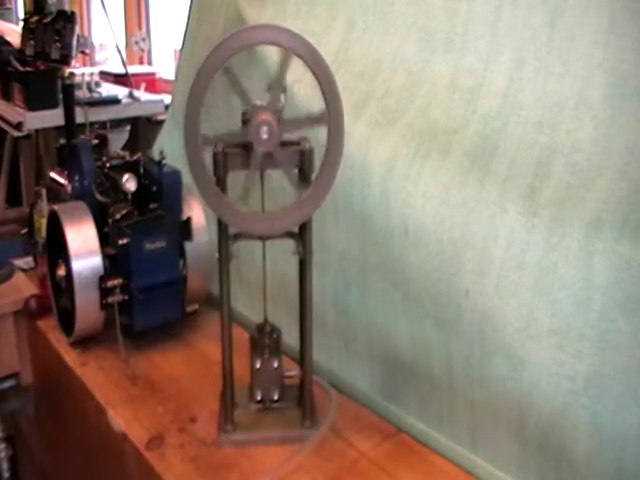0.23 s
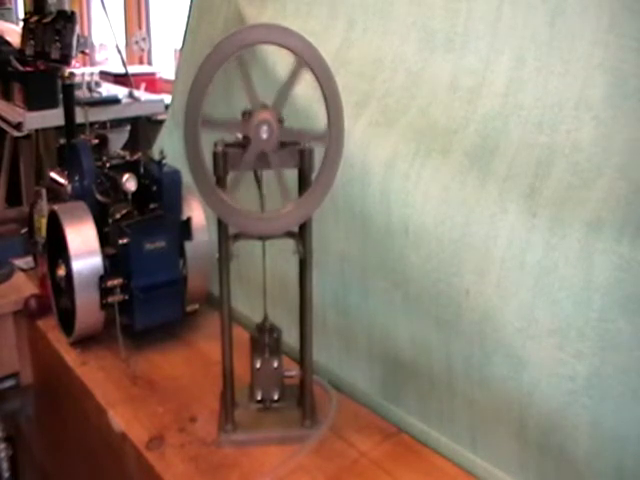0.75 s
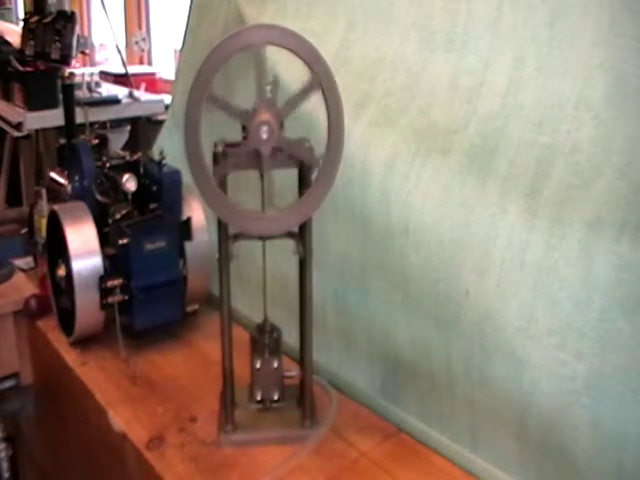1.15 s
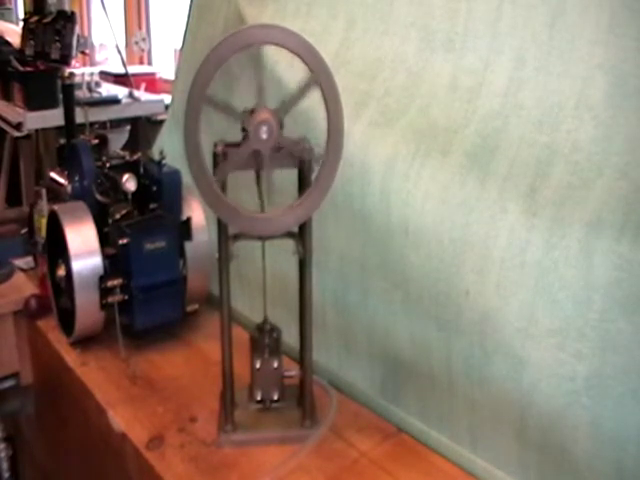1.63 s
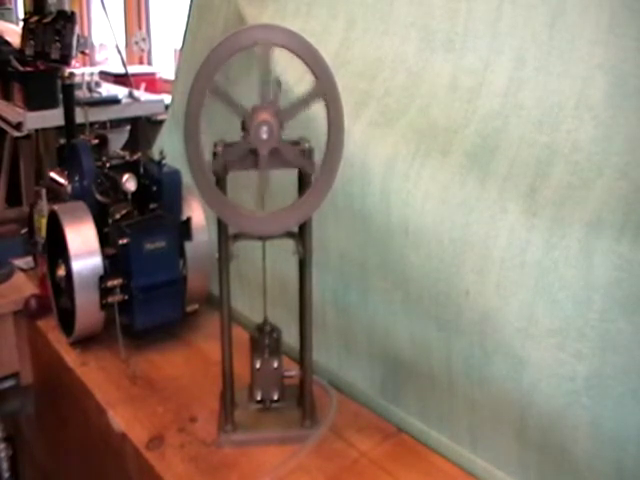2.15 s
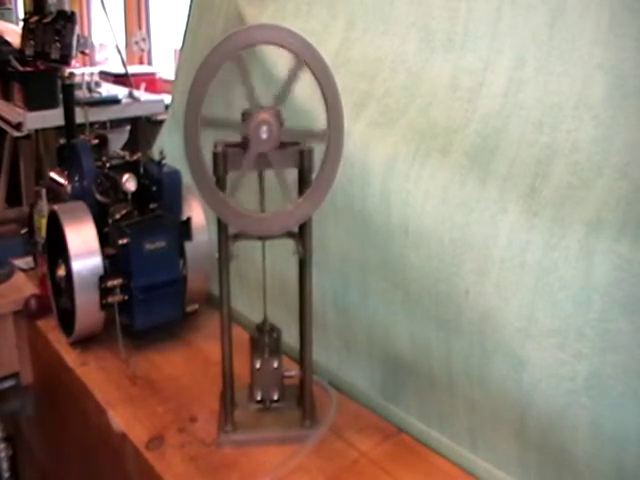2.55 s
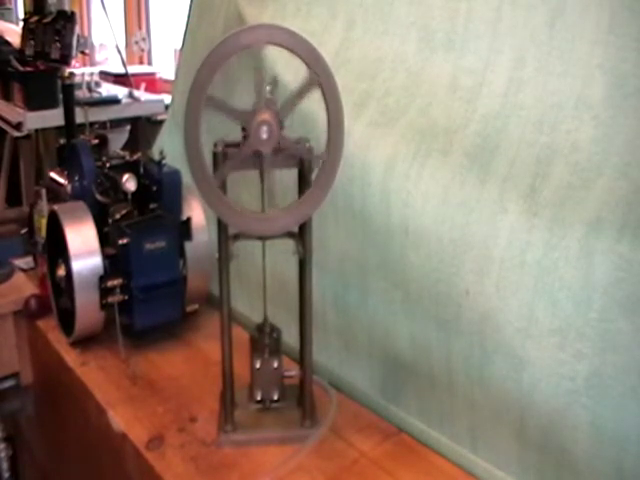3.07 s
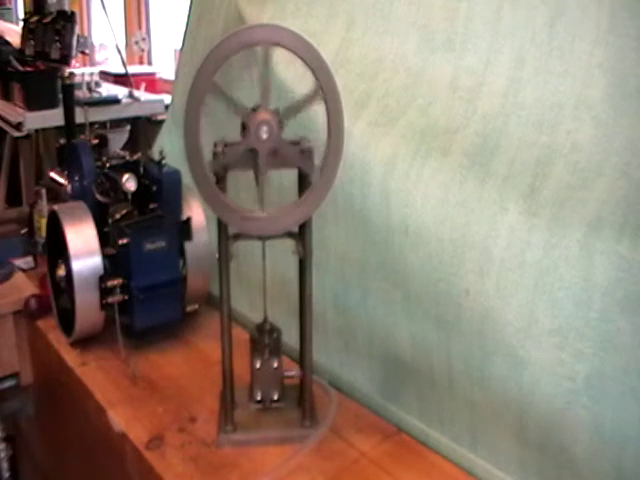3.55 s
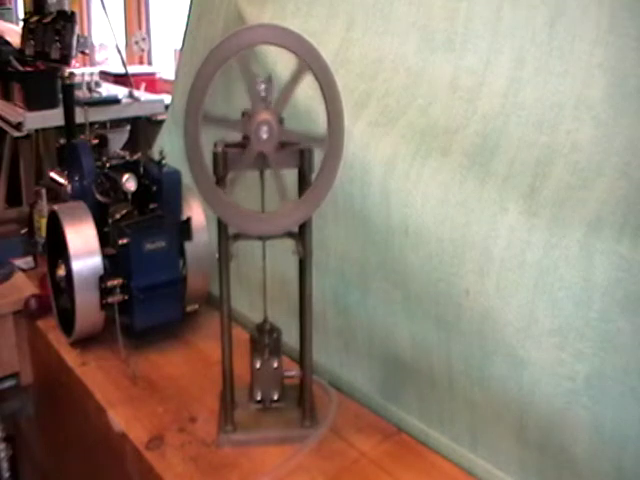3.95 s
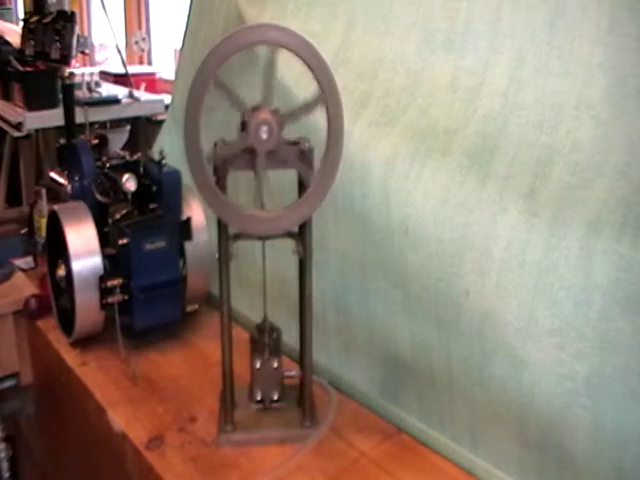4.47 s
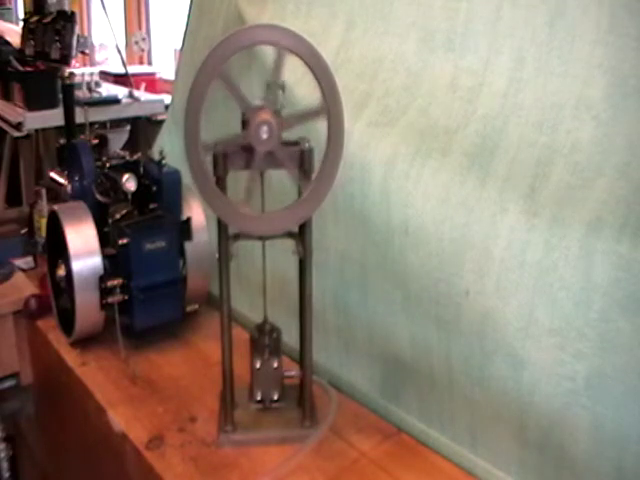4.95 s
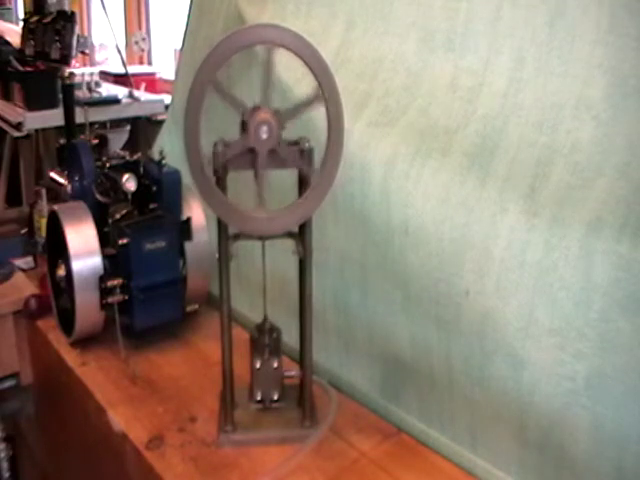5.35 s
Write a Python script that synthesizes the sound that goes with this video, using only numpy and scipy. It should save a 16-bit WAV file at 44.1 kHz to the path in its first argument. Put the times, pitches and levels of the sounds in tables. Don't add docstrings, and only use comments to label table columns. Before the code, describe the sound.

A small flywheel engine runs on compressed air on a wooden bench indoors. Bright hisses alternate each half turn, with a faint airy whistle near 2.3 kHz and dull knocks about twice a second. Just after one second a loose metal part scrapes and clatters loudly, stopping abruptly. The engine then continues alone, slightly faster. Close stereo microphone, small room, little echo.

```python
import sys
import numpy as np
from scipy import signal
from scipy.fft import rfft, irfft, next_fast_len
from scipy.io import wavfile
from scipy.ndimage import uniform_filter1d, map_coordinates

SR = 44100
rng = np.random.default_rng(int(sys.argv[2]) if len(sys.argv) > 2 else 0)


def bounce(signal):
    frames = np.transpose(np.atleast_2d(signal))
    limited = np.clip(frames, -1, 1)
    pcm = np.round(limited * 32767).astype(np.int16)
    wavfile.write(sys.argv[1], SR, pcm)


def field_ratio(decibels):
    return 10 ** (np.asarray(decibels, dtype=float) / 20)


N = 247401

TURN_STARTS = [-.89, .1126, 1.116, 2.1066, 3.055, 3.9739, 4.8765, 5.755]
# pitch_hz, density_db (per Hz)
UPPER_JET = [(1530, -17), (2600, -15), (3170, -6), (4000, -8), (4950, 0.5), (6300, -9), (6850, -4),
             (8460, 1), (9260, -4.5), (10500, -1.5), (11100, -1), (12900, -11.5), (15800, -28)]
LOWER_JET = [(1530, -37), (2600, -1), (3790, -17.5), (4320, -6.5), (5930, 0), (6400, -1.5), (7840, -6),
             (8720, 0.5), (10800, -5), (11700, -8.5), (12300, -24), (13300, -11), (15800, -28)]
# pitch_hz, width_hz, level_db
UPPER_CAVITY = [(5200, 350, -1.5), (6500, 420, -8), (6730, 220, -11), (7040, 250, 2), (7900, 470, 1),
                (10335, 390, 7), (10800, 300, 2), (11300, 400, -5), (11700, 350, 2), (12500, 400, 1)]
LOWER_CAVITY = [(5650, 350, -1.5), (6450, 520, 8.5), (8670, 580, 5), (9550, 400, 2.5), (10000, 220, -9),
                (10250, 300, -5), (10950, 250, 1), (11830, 550, 9.5)]
# pitch_hz, width_hz, level_db
PIPE_MODES = [(2205, 45, 0), (2290, 100, -3.5), (2400, 160, -10)]
# turn_share (0-1), level_db
UPPER_FLOW = [(0, -42.5), (.1, -47.5), (.2, -42), (.3, -45.5), (.51, -44.5), (.575, -58), (.87, -63),
              (.975, -54), (1, -42.5)]
LOWER_FLOW = [(0, -51), (.1, -46), (.33, -43.5), (.51, -63), (.565, -43.5), (.72, -42), (.79, -51),
              (.9, -54), (1, -51)]
PIPE_FLOW = [(0, -57), (.05, -66), (.14, -56), (.31, -47.5), (.5, -50.5), (.73, -46), (.89, -61),
             (.93, -53), (1, -57)]
GLAND_FLOW = [(0, -53), (.15, -52.5), (.42, -63), (.53, -56), (.74, -60), (.93, -52), (1, -53)]
# turn_share (0-1), level_db, pitch_hz
PORT_TONE = [(0, -75, 5900), (.53, -75, 5900), (.58, -52, 6000), (.66, -51, 6350), (.74, -53, 6550),
             (.84, -72, 6600), (1, -75, 6600)]
# turn_share (0-1), level_db
BEARING_LOAD = [(0, 0), (.1, 1.5), (.25, 4), (.33, -2.5), (.44, -1.5), (.51, 5), (.66, 0), (.86, -4),
                (1, 2.5)]
# time_s, level_db
HUM_LEVEL = [(0, -64), (.36, -64), (.8, -58), (1.37, -65), (2.64, -62), (3.02, -52), (3.3, -63),
             (3.45, -62), (3.66, -49), (4.62, -52.5), (4.76, -61), (5.61, -53)]
# centre_s, lift_db, width_s
JOLTS = [(.42, 3, .14), (.64, 9, .06), (1.28, 15, .05), (1.6, 3, .15)]
# time_s, level_db
RUSTLE_LEVEL = [(0, -70), (.15, -62), (.42, -55), (.62, -55), (.8, -54), (.9, -68), (1.4, -60), (1.95, -62),
                (2.1, -75), (5.61, -75)]
# start_s, peak_db
UNSEAT_SPURTS = [(1.057, -42.5), (2.0416, -40.5), (2.9911, -40), (3.92, -42), (4.8309, -38.5)]
SLAP_SPURTS = [(.073, -41.5), (3.0185, -43.5), (3.951, -43), (4.85, -48)]
OPEN_SPURTS = [(.1126, -33), (2.1066, -34.5), (3.055, -35), (3.9739, -33.5), (4.8765, -32)]
REVERSE_SPURTS = [(.599, -44), (1.61, -37), (2.5326, -44.5), (3.507, -41), (4.417, -38.5), (5.314, -39)]
CLOSE_SPURTS = [(.646, -41), (2.5835, -39), (2.609, -35), (3.542, -37.5), (4.454, -44)]
# pitch_hz, length_s, thud_db
SPURT_KINDS = [
    (2280, .016, -7),
    (2340, .01, 3),
    (2390, .0085, -21),
    (2370, .014, -1.5),
    (2420, .004, -16),
]
# start_s, peak_db, snap_db
TOP_KNOCKS = [
    (0.212, -23, -20),
    (2.192, -20, -20),
    (3.137, -19.5, -15),
    (4.056, -19.5, -16),
    (4.954, -19, -15.5),
]
BOTTOM_KNOCKS = [
    (0.664, -26, -9),
    (1.661, -24.5, -11),
    (2.624, -25, -15),
    (3.566, -23.5, -21),
    (4.474, -23.5, -12),
    (5.361, -24, -12),
]
# start_s, peak_db
TAKE_UP = [(0.182, -33), (2.168, -33), (3.12, -29.5), (4.036, -31), (4.934, -28.5)]
# pitch_hz, t60_s, top_knock_db, bottom_knock_db, take_up_db
BENCH_MODES = [(180, 0.076, -6, -0.5, -8), (218, 0.091, -5, -5, -22), (287.8, 0.095, -3, -2.5, -8),
               (336, 0.084, 0, -1.5, -11), (405.6, 0.17, -13, -11, -12), (455.6, 0.088, -9.5, -3.5, -21),
               (543.7, 0.083, 1.5, -1.5, 1), (580.7, 0.089, -2.5, -3, 4), (636, .09, -2.5, -7.5, -12),
               (735, 0.083, -4.5, -5.5, 3), (882, 0.068, -9, -17.5, -19), (964, .11, -11.5, -10.5, -27),
               (1078.4, 0.052, -4.5, -1, -12), (1262, 0.036, -5.5, -13, -23), (1365, 0.066, -10.5, -2, -14),
               (1508, 0.046, -4, -4.5, -12), (1675, 0.024, -4, -5, -14), (1865, 0.04, -12, -25, -30),
               (2300, 0.036, -8, -26, -30), (2450, 0.037, -10, -26, -30), (2800, .04, -14, -22, -30),
               (2890, 0.032, -7, -16, -30), (3020, 0.034, -6, -24, -30)]
# start_s, peak_db, low_part_db
ROD_REVERSALS = [(0.6053, -35, -1), (1.6008, -35, -12), (2.5794, -33, -6), (3.5009, -35, -8),
                 (4.4194, -42, -5), (5.2999, -33, -10)]
# start_s, level_db, pitch_hz
BUMPS = [(.075, -42, 750), (.075, -39, 342), (.119, -45, 1730), (.305, -38, 1200), (.44, -42, 747),
         (.572, -41, 1020), (.583, -37, 1230), (.603, -42, 1080), (.59, -44, 1740), (.62, -38.5, 71),
         (.794, -43, 750), (.81, -46, 1100), (3.95, -41, 740), (4.15, -35, 169)]
# start_s, level_db, pitch_hz
THUMPS = [(1.117, -21.5, 174), (1.117, -24, 579), (1.117, -27, 290), (1.12, -29, 800), (1.17, -25, 412),
          (1.19, -26, 170), (1.17, -34, 70), (1.205, -24, 547), (1.21, -27, 400), (1.25, -19.5, 406),
          (1.255, -31, 199), (1.272, -30, 600), (1.28, -37, 70), (1.305, -40, 336)]
# start_s, level_db, rise_s, t60_s, loudest_hz
SCRAPES = [
    (1.119, -20, 0.0035, 0.26, 3100),
    (1.145, -11.5, 0.0056, .13, 2850),
    (1.15, -19, 0.0093, 0.2, 1570),
    (1.172, -20, 0.0067, .3, 3500),
    (1.2, -24, 0.012, 0.28, 1100),
    (1.2514, -16, 0.001, 0.11, 6100),
    (1.255, -19.5, 0.0044, 0.19, 2200),
    (1.275, -19, 0.011, 0.14, 2900),
]
# pitch_hz, width_hz, level_db
PART_MODES = [(1098, 59, -2), (1550, 69, -4), (2160, 60, -2), (2820, 210, -7), (3570, 91, -0.5),
              (4100, 170, -20), (4650, 32, -4), (5880, 19, -8), (6950, 48, -3), (8700, 120, -8)]
# pitch_hz, density_db (per Hz)
PART_SPECTRUM = [(71, -44), (120, -12), (167, 4), (405, -5.5), (836, -10), (1530, -3.5), (1830, -4.5),
                 (2820, -8), (6810, -11), (9500, -14.5), (13000, -48)]
# start_s, level_db, pitch_hz
BOUNCES = [(1.121, -27.2, 2411), (1.1235, -27.0, 1550), (1.125, -30.0, 3703), (1.128, -28.8, 2670),
           (1.1364, -24.3, 1550), (1.1439, -19.2, 2842), (1.1464, -27.0, 1119), (1.1479, -28.5, 3962),
           (1.1479, -23.3, 1722), (1.1494, -28.4, 6976), (1.1514, -18.5, 2756), (1.1529, -26.4, 4737),
           (1.1549, -30.2, 6546), (1.1554, -21.1, 3359), (1.1569, -22.1, 2670), (1.1574, -21.5, 2239),
           (1.1619, -21.0, 1550), (1.1639, -23.9, 2928), (1.1699, -27.9, 3617), (1.1738, -25.6, 1550),
           (1.1758, -27.9, 2842), (1.1773, -29.0, 3617), (1.1793, -24.8, 1378), (1.1853, -23.0, 1205),
           (1.1893, -29.4, 2670), (1.1908, -24.2, 1119), (1.1993, -25.3, 1205), (1.2177, -27.4, 1119),
           (1.2507, -27.6, 2756), (1.2507, -23.3, 1722), (1.2512, -26.5, 5857), (1.2517, -26.2, 3531),
           (1.2517, -25.7, 6890), (1.2567, -29.3, 6287), (1.2577, -29.3, 5770), (1.2582, -28.3, 3359),
           (1.2611, -26.4, 2670), (1.2636, -27.4, 3703), (1.2661, -30.4, 5770), (1.2681, -22.8, 1636),
           (1.2686, -28.4, 2670), (1.2736, -28.6, 2842), (1.2856, -28.5, 1636), (1.2861, -29.5, 3186)]
# pitch_hz, density_db (per Hz)
ROOM_TONE = [(20, -48), (31, -8), (161, -1.5), (245, -8.5), (524, -7.5), (629, -12.5), (1580, -17),
             (2270, -6.5), (2590, -13.5), (3370, -10), (3950, -17), (6330, -6.8), (11900, -14),
             (13200, -13.5), (15800, -22)]
# pitch_hz, width_hz, level_db
LEAK = [(5830, 1300, 2), (8140, 410, 6), (10700, 400, -4), (12300, 300, -1.5)]
# pitch_hz, t60_s
WALL_DECAY = [(150, 0.25), (1000, 0.087), (8000, 0.2)]
# pitch_hz, level_db
SIDE_LEVEL = [(60, -11.5), (200, -17.5), (600, -11), (950, -6.5), (2300, -16.5), (3300, -15), (4000, -14.5),
              (5700, -18), (7300, -19), (8100, -21), (9200, -12), (10400, -12), (12000, -4.5),
              (15500, -6.5)]
# pitch_hz, width_hz, level_db
HOUSING = [(3930, 390, -1.5), (4370, 270, 1.5), (4650, 260, -2.5), (7210, 200, -1), (9320, 220, -1.5),
           (12100, 300, -1.5), (13100, 500, 2.5), (14050, 250, -2), (14400, 300, 2), (15050, 400, -3),
           (15600, 250, 3)]


def unit(x):
    return x / np.sqrt(np.mean(x ** 2) + 1e-20)


def along(points, hz):
    f, v = np.transpose(points)
    return np.interp(np.log(hz + 1), np.log(f + 1), v)


def over_time(points):
    return field_ratio(np.interp(np.arange(N) / SR, *np.transpose(points)))


def turn_share():
    return np.interp(np.arange(N) / SR, TURN_STARTS, np.arange(len(TURN_STARTS))) % 1


def per_turn(points):
    return field_ratio(np.interp(turn_share(), *np.transpose(points)))


def wobble(rate):
    knots = rng.standard_normal(int(N * rate / SR) + 4)
    return map_coordinates(knots, [np.arange(N) * rate / SR])


def filtered(x, response):
    m = next_fast_len(x.shape[-1] + 8192)
    spectrum = rfft(x, m) * response(np.fft.rfftfreq(m, 1 / SR))
    return irfft(spectrum, m)[..., :x.shape[-1]]


def resonances(peaks, f):
    return sum((-1) ** k * field_ratio(db) * 1j * f * width / (hz * hz - f * f + 1j * f * width)
               for k, (hz, width, db) in enumerate(peaks))


def bumps(peaks, f):
    return field_ratio(sum(db * np.exp(-2 * ((f - hz) / width) ** 2) for hz, width, db in peaks))


def ripple(f, spacing_hz, depth_db):
    knots = rng.standard_normal(2000)
    return field_ratio(depth_db * map_coordinates(knots, [np.minimum(f / spacing_hz, 1999)]))


def rush(response, patchy_db):
    z = signal.stft(rng.standard_normal(N + 512), nperseg=512)[2]
    field = uniform_filter1d(rng.standard_normal(z.shape), 6, 0)
    field = uniform_filter1d(field, 10, 1)
    patchy = signal.istft(z * field_ratio(patchy_db * unit(field)), nperseg=512)[1][:N]
    return unit(filtered(patchy, response))


def shaped(envelope, noise):
    return unit(envelope * noise) * np.sqrt(np.mean(envelope ** 2))


def gritty(length, hold, spread_db):
    noise = rng.standard_normal(length)
    steps = rng.standard_normal(length // hold + 1).repeat(hold)[:length]
    return noise * field_ratio(spread_db * steps)


def add(track, s, sound):
    part = track[round(s * SR):][:len(sound)]
    part += sound[:len(part)]


def air():
    t = np.arange(N) / SR
    upper = rush(lambda f: field_ratio(along(UPPER_JET, f)) * bumps(UPPER_CAVITY, f) * ripple(f, 28, depth_db=2.2),
                 patchy_db=1.1)
    lower = rush(lambda f: field_ratio(along(LOWER_JET, f)) * bumps(LOWER_CAVITY, f) * ripple(f, 28, depth_db=2.6),
                 patchy_db=1.5)
    jets = field_ratio(5) * per_turn(UPPER_FLOW) * upper + field_ratio(1.5) * per_turn(LOWER_FLOW) * lower
    supply_db = .6 - .28 * t + .7 * wobble(12)
    pipe = rush(lambda f: resonances(PIPE_MODES, f) / (1 + (2165 / (f + 1)) ** 60), patchy_db=.8)
    steadiness = .6
    pipe = unit(pipe / (uniform_filter1d(pipe ** 2, SR // 25) + .05) ** (steadiness / 2))
    first_turn_db = -3 * (t < 1.3)
    whistle = per_turn(PIPE_FLOW) * field_ratio(first_turn_db + .6 * wobble(25)) * pipe
    return jets * field_ratio(supply_db) + field_ratio(-0.3) * whistle


def port_tone():
    share, db, hz = np.transpose(PORT_TONE)
    turn = turn_share()
    fuzz = unit(filtered(rng.standard_normal((2, N)), lambda f: 1 / (1 + (f / 260) ** 4)))
    phase = 2 * np.pi * np.cumsum(np.interp(turn, share, hz)) / SR
    return field_ratio(np.interp(turn, share, db)) * (fuzz[0] * np.cos(phase) + fuzz[1] * np.sin(phase))


def gland():
    jet = filtered(rng.standard_normal(N), lambda f: resonances([(13200, 2200, 0)], f) ** 2 * (f > 12300))
    return per_turn(GLAND_FLOW) * unit(jet)


def shake():
    t = np.arange(N) / SR
    jolt_db = sum(db * np.exp(-((t - s) / width) ** 2) for s, db, width in JOLTS)
    force = field_ratio(jolt_db) * per_turn(BEARING_LOAD)
    hum = over_time(HUM_LEVEL) * field_ratio(2.4 * wobble(16))
    hum = hum * rush(lambda f: resonances([(167, 15.5, 0)], f), patchy_db=0.0)
    buzz_db = -56 - 8 / (1 + np.exp((1.95 - t) / .15))
    buzz = field_ratio(buzz_db + 1.3 * wobble(6.2) - 2)
    buzz = buzz * rush(lambda f: resonances([(353, 13, 0)], f), patchy_db=-2.4)
    modes = [(hz, 70, db) for hz, _, db, *_ in BENCH_MODES[5:17]]
    rattle = field_ratio(-59 + 3.1 * wobble(20) - 4) * rush(lambda f: resonances(modes, f), patchy_db=2.0)
    return force * (hum + buzz + rattle)


def room():
    low_hum = [(39.7, 16, 4), (98, 24, -3.5)]  # pitch_hz, width_hz, level_db
    return field_ratio(-43) * rush(lambda f: field_ratio(along(ROOM_TONE, f)) * bumps(LEAK + low_hum, f)
                           * ripple(f, 30, depth_db=1.5), patchy_db=1.74)


def rustle():
    friction = rush(lambda f: resonances([(1150, 350, 0), (1650, 400, -2)], f), patchy_db=2.5)
    return over_time(RUSTLE_LEVEL) * field_ratio(2.5 * wobble(30)) * friction


def spurts():
    out, t = np.zeros(N), np.arange(SR // 8) / SR
    tables = (UNSEAT_SPURTS, SLAP_SPURTS, OPEN_SPURTS, REVERSE_SPURTS, CLOSE_SPURTS)
    bench = [(c, 60, -3) for c, *_ in BENCH_MODES[:10]]
    for table, (hz, length, thud_db) in zip(tables, SPURT_KINDS):
        swell = t / length * np.exp(1 - t / length)
        neighbours = [(1.38 * hz, 400, -20), (.75 * hz, 300, -17)]

        def jet_response(f):
            broad = field_ratio(-21) * (f > 1500) / (1 + (f / 6000) ** 4)
            return resonances([(hz, 330, 0)], f) ** 2 + resonances(neighbours, f) + broad

        for s, db in table:
            jet, push = rng.standard_normal((2, len(t)))
            jet = unit(filtered(jet, jet_response))
            push = unit(filtered(push, lambda f: resonances(bench, f)))
            spurt = field_ratio(db - 2.5) * shaped(swell, jet) + field_ratio(db + thud_db - 7) * shaped(swell, push)
            add(out, max(s - .005, 0), spurt)
    return out


def stand():
    out, t = np.zeros(N), np.arange(SR // 3) / SR
    for s, db, hz in BUMPS + THUMPS:
        rise, t60 = np.array([.008, .14]) * (400 / hz) ** .45
        drift = np.cumsum(rng.standard_normal(len(t))) * 0.025 * max(hz / 400, 1)
        envelope = field_ratio(db - 60 * t / t60) * (1 - np.exp(-t / rise))
        add(out, s, envelope * np.sin(2 * np.pi * hz * t + drift))
    return out


def knocks():
    out, t = np.zeros(N), np.arange(SR // 5) / SR
    hz, t60, *levels = np.transpose(BENCH_MODES)[:, :, None]
    touches = [(s, db, -24) for s, db in TAKE_UP]
    build_cycles = (3.2, 2.2, 5.5)
    for table, mode_db, cycles in zip((TOP_KNOCKS, BOTTOM_KNOCKS, touches), levels, build_cycles):
        start = rng.uniform(-np.pi, np.pi, hz.shape) / 2
        build = 1 - np.exp(-t * hz / cycles)
        hold_db = -60 * (t / (1.15 * t60)) ** 1.35
        late = np.maximum(t - .021, 0)
        rebound = field_ratio(mode_db - 5.5 - 60 * late / t60 - 5 * hz / 1000) * (1 - np.exp(-late / 0.0028))
        rebound = np.sum(rebound * np.sin(2 * np.pi * hz * late), axis=0)
        for s, db, snap_db in table:
            scatter_db = rng.normal(0, .8, hz.shape)
            bright_db = (snap_db + 15) * (hz > 2000)
            modes = field_ratio(mode_db + bright_db + scatter_db + hold_db) * build
            ring = np.sum(modes * np.sin(2 * np.pi * hz * t + start), axis=0)
            shudder = filtered(rng.standard_normal(len(t)), lambda f: resonances([(400, 420, 0)], f) ** 2)
            shudder = field_ratio(2.5 - 60 * t / .15) * (1 - np.exp(-t / .012)) * unit(shudder)
            snap = filtered(rng.standard_normal(len(t)), lambda f: resonances([(3200, 3000, 0)], f))
            snap = snap * field_ratio(snap_db + 18.5 - 60 * t / 0.037) * (1 - np.exp(-t / 0.0012))
            add(out, s - .0042, field_ratio(db - 10.5) * (ring + rebound + shudder + snap))
    return out


def rattles():
    out, t = np.zeros(N), np.arange(SR // 10) / SR
    for s, db, low_db in ROD_REVERSALS:
        rod = [(1100, 1200, low_db), (3900, 1400, 0)]
        chatter = filtered(gritty(len(t), 40, 4), lambda f: resonances(rod, f))
        envelope = field_ratio(db - 5.5 - 60 * t / .12) * (1 - np.exp(-t / 0.0017))
        add(out, s - .003, shaped(envelope, chatter))
    return out


def scrape():
    out, t = np.zeros(N), np.arange(SR // 4) / SR
    lift = [(c, w * 1.7, 8.5 + db / 2) for c, w, db in PART_MODES]
    for s, db, rise, t60, hz in SCRAPES:
        tilt_db = .3 * np.clip(db + 19, -5, 4)

        def part_response(f):
            octaves = np.log2(np.maximum(f, 800) / 2000)
            spectrum = field_ratio(along(PART_SPECTRUM, f) + tilt_db * octaves)
            return spectrum * bumps(lift + [(hz, 0.42 * hz, 4)], f) * ripple(f, 90.24, depth_db=2.1)

        friction = filtered(gritty(len(t), 30, 2.4), part_response)
        envelope = field_ratio(db - 60 * t / t60) * (1 - np.exp(-t / rise))
        add(out, s, shaped(envelope, friction))
    stop = 1 / (1 + np.exp(np.clip((np.arange(N) / SR - 1.305) / 0.011, -50, 50)))
    return field_ratio(-3) * out * stop


def strikes():
    out, t = np.zeros(N), np.arange(SR // 12) / SR
    chance = rng.uniform(-1, 1, (len(BOUNCES), 3))
    for (s, db, hz), (a, b, c) in zip(BOUNCES, chance):
        t60 = .043 * (2000 / hz) ** .2
        split_hz = hz + 160 * c
        pair = np.sin(2 * np.pi * (hz * t + a)) + .45 * np.sin(2 * np.pi * (split_hz * t + b))
        add(out, s, field_ratio(db + 4.3 - 60 * t / t60) * (1 - np.exp(-t / .002)) * pair)
    return out


def walls(x):
    hz, t, z = signal.stft(rng.standard_normal((2, SR // 2)), SR, nperseg=256)
    tail = signal.istft(z * field_ratio(-60 * t / along(WALL_DECAY, hz)[:, None]), SR, nperseg=256)[1]
    tail = tail / np.linalg.norm(tail[0])
    delayed = np.pad(x, (300, 0))[None]
    return signal.fftconvolve(delayed, tail, axes=1)[:, :N]


def spread(x):
    mid = filtered(x, lambda f: bumps(HOUSING, f))
    side = filtered(np.roll(x, SR // 30), lambda f: field_ratio(along(SIDE_LEVEL, f)))
    return np.array([mid + side, mid - side])


def scene():
    steady = spread(air() + port_tone() + gland() + shake() + room() + rustle())
    hits = spurts() + stand() + knocks() + rattles() + scrape() + strikes()
    aside = filtered(np.roll(hits, SR // 200), lambda f: resonances([(2500, 4100, 0)], f)) * [[1], [-1]]
    balance = field_ratio([[.15], [-.15]])
    return (steady + hits + field_ratio(-15) * walls(hits) + field_ratio(-13.5) * aside) * balance


def low_pass(x):
    return signal.sosfilt(signal.butter(12, 16000, fs=SR, output="sos"), x)


def record(dry):
    mix = filtered(dry, lambda f: f < 15810)
    return low_pass(mix)


dry = scene()
out = record(dry)
bounce(out)
```